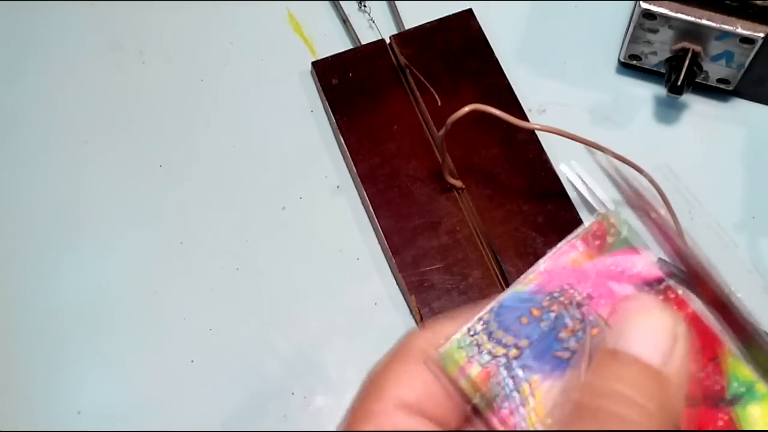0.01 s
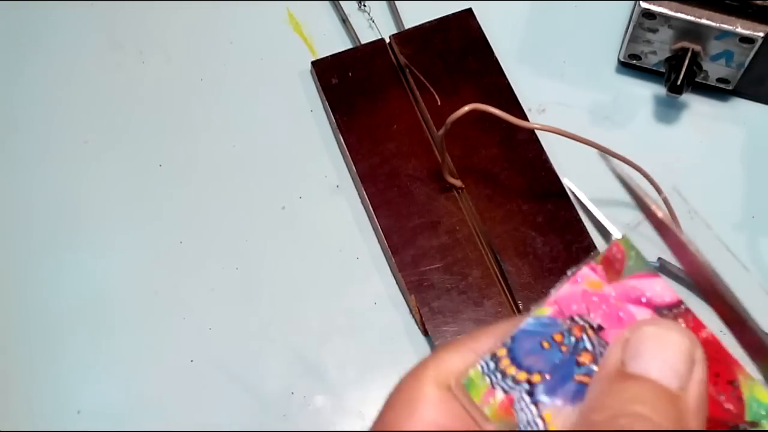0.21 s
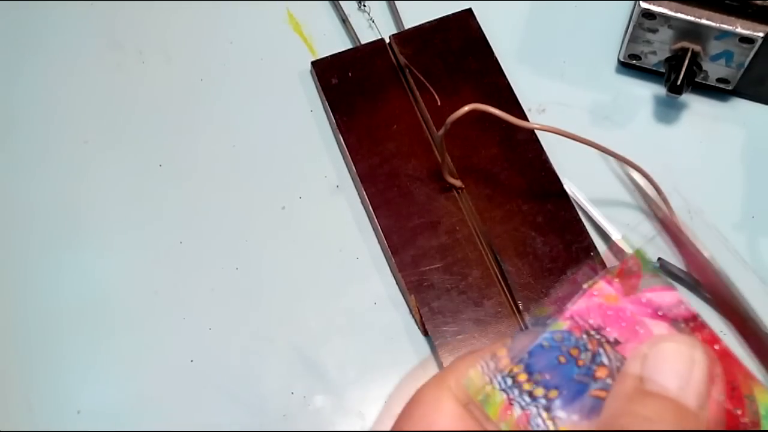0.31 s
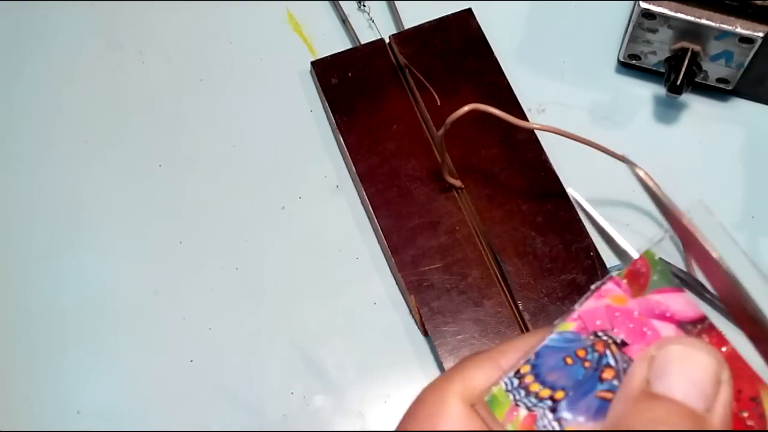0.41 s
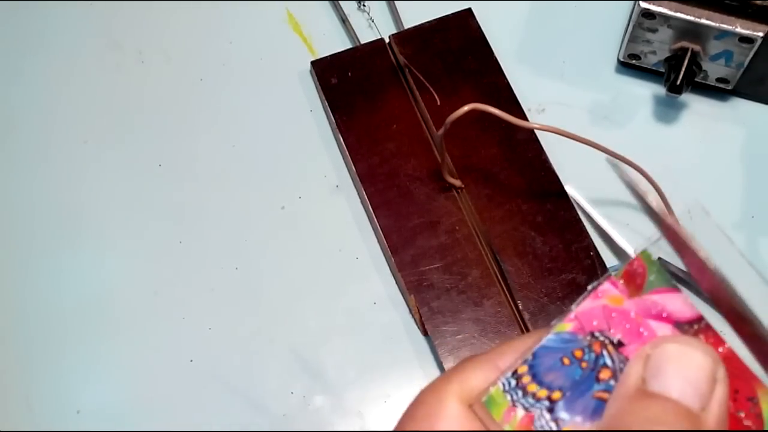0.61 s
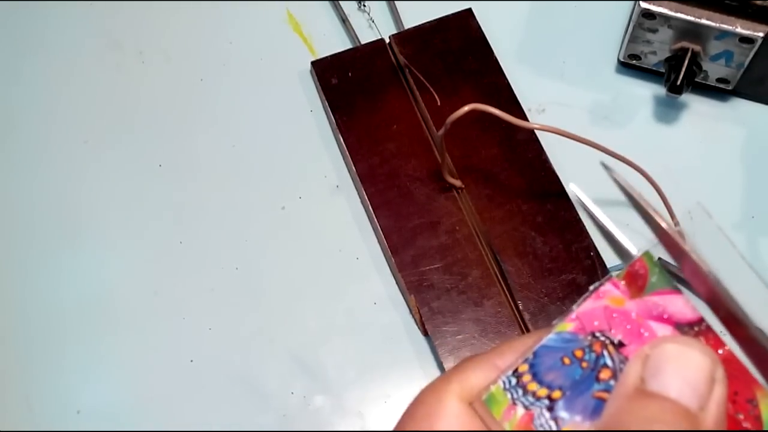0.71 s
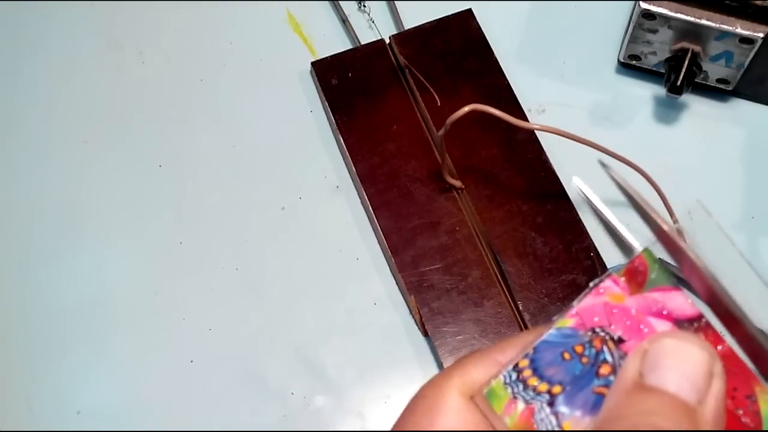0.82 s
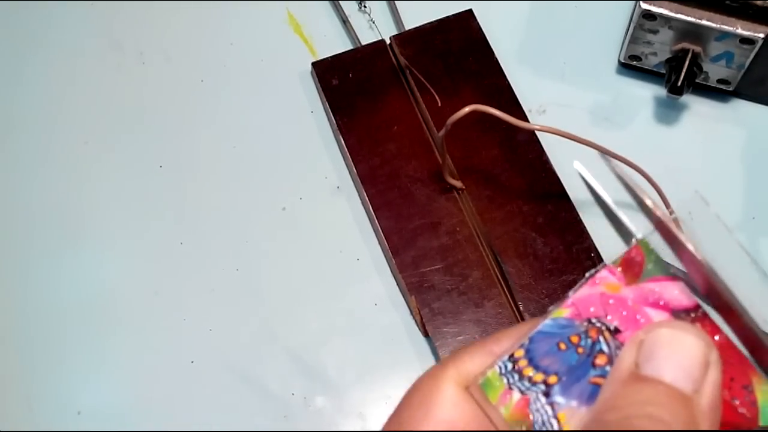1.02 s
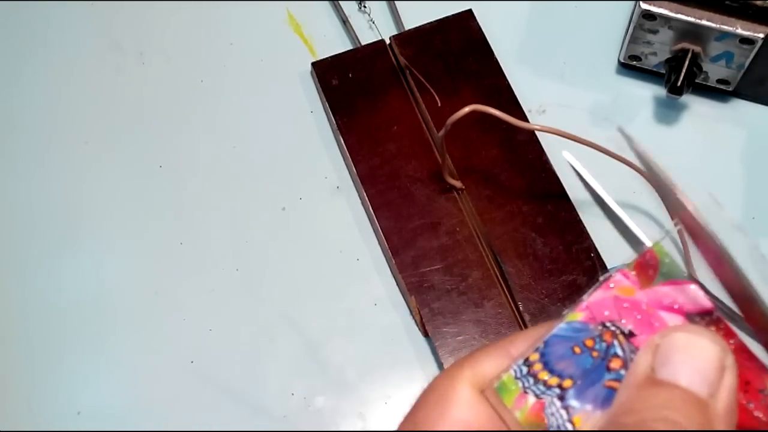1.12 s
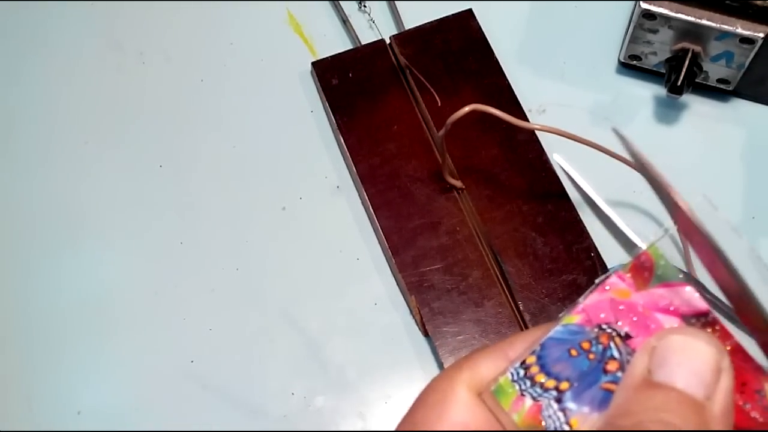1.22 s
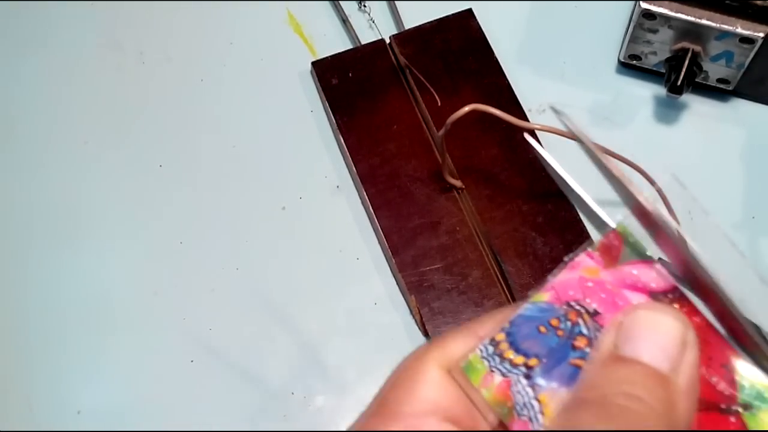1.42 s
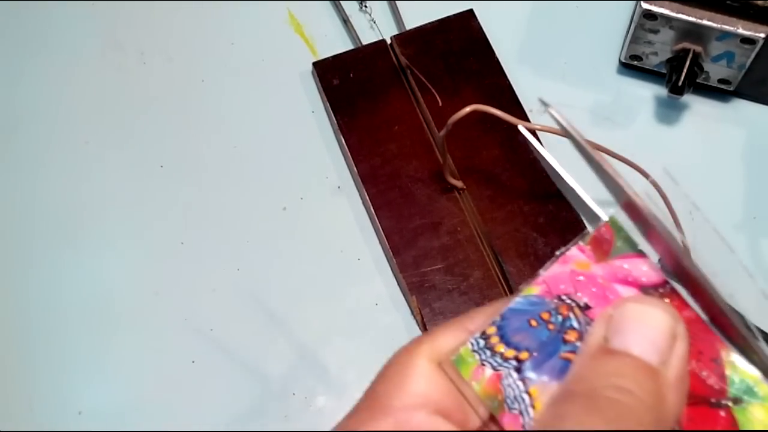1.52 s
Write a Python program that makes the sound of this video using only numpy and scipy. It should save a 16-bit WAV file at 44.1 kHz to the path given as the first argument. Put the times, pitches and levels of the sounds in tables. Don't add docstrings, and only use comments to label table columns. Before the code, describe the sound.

Close to a small microphone at a work table, scissor blades nip crisp plastic in short uneven snaps with tiny ticks between, a light rasp as they open, and one last snap over low hiss and hum.

```python
import sys
import numpy as np
from scipy import signal
from scipy.fft import rfft, irfft
from scipy.io import wavfile
from scipy.ndimage import uniform_filter1d

SR = 44100
rng = np.random.default_rng(int(sys.argv[2]) if len(sys.argv) > 2 else 0)


def unload_audio(sound):
    columns = np.transpose(np.atleast_2d(sound))
    steps = np.round(np.clip(columns, -1, 1) * 32767)
    wavfile.write(sys.argv[1], SR, steps.astype(np.int16))


def gain_from_decibels(decibels):
    exponent = np.asarray(decibels, float) / 20
    return 10 ** exponent


N = 70560

# freq_hz, density_db_per_hz
HISS_SPECTRUM = [(41, -48), (70, -6), (151, -14), (212, -9), (572, -17.5), (627, -17), (4370, -27.5),
                 (10600, -34), (15500, -55)]
# time_s, pitch_hz, level_db
HUM_TRACK = [(0.0, 54.3, -115), (0.098, 58, -66), (0.266, 54.7, -70.5), (0.32, 54.6, -69.5),
             (0.632, 53.45, -67.5), (0.654, 56.7, -69), (0.934, 55.8, -63), (0.992, 54.9, -66),
             (1.148, 54.2, -59.5), (1.194, 54.6, -67.5), (1.55, 53.8, -66.5), (1.6, 56, -69)]
BREAK_S = [.0100, .0495, .1976, .2013, .2097, .2109, .2122, .3186, .3368, .3872, .3916, .6575, .6870, .7273,
           1.1128, 1.1594, 1.2497, 1.3117, 1.3202, 1.3216, 1.3975, 1.5262]
# sheet_hz, sheet_peak_db, mid_db (mostly 3 to 5.5 kHz), body_db (under 2.8 kHz), edge_db (over 6
# kHz)
BREAK_LEVELS = [(4140, -44.5, -65, -45.5, -78), (4200, -52.5, -82, -77, -75), (3520, -70, -71, -34, -74),
                (4340, -20.5, -25, -24, -22), (4400, -52, -36, -50, -56), (4210, -21, -50, -19, -65),
                (3730, -17.5, -45, -24, -47), (4530, -38.5, -50, -43, -40.5), (4800, -50.5, -73, -72, -81),
                (4700, -69, -69, -87, -75), (4410, -10.5, -13.5, -15.5, -12.5),
                (4430, -50.5, -71, -77, -68), (4470, -51, -80, -71, -84), (4550, -41.5, -66, -67, -65),
                (3700, -39.5, -46, -38, -70), (4070, -52.5, -51, -60, -52), (3940, -74, -57, -66, -86),
                (4540, -36, -45, -37, -35.5), (4480, -16, -26, -14, -59), (4630, -18, -20.5, -52, -18.5),
                (4570, -52, -58, -48, -52.5), (4940, -41, -54, -51, -41.5)]
# freq_hz, width_hz, level_db
BODY_MODES = [(504, 400, -16), (950, 260, 1), (1700, 142, -4.5), (1959, 204, 12), (2620, 625, 11.5)]
# freq_hz, width_hz,
# level_db
MID_MODES = [(3260, 380, 0), (3680, 250, -11), (5390, 450, -5)]
# freq_hz, width_hz, level_db
EDGE_MODES = [(6200, 1270, 27), (7300, 1200, -23), (8000, 1600, -21), (10300, 2000, -30.5),
              (13200, 2500, -36)]
# time_s, level_db
SCRAPE_TRACK = [
    (1.06, -89),
    (1.072, -69),
    (1.086, -67),
    (1.095, -54),
    (1.112, -59),
    (1.139, -55.5),
    (1.165, -67.5),
    (1.19, -70.5),
    (1.22, -78),
]

HISS_DB, HUM_WAVER_HZ = -64.5, 2.5
SHEET_WIDTH_HZ, CLICK_GAIN, EDGE_CLICK_GAIN = 1150, 0.8, 0.45
CRACKLE_DB, CRACKLE_T60_S, CRACKLE_SCATTER_DB = -22, 0.02, 2
ROOM_DB, ROOM_T60_S, ROOM_RISE_S, ROOM_SCATTER_DB = -25.5, 0.072, 0.00033, 1.2
LATE_DB, LATE_T60_S = -46, 0.16
BODY_ROOM_DB, MID_ROOM_DB, BODY_SOFT_HZ = -4.5, -6, 6800
CUTS_LOW_HZ, CUTS_HIGH_HZ = 480, 12500
SCRAPE_BODY_DB, SCRAPE_EDGE_DB, SCRAPE_SCATTER_DB = -5, -26, 1.5
GAP_HZ, GAP_WIDTH_HZ, TOP_HZ, LOW_HZ = 12000, 850, 16600, 47


def fade(t_s, start_db, t60_s):
    return gain_from_decibels(start_db - 60 * t_s / t60_s)


def grains(count, scatter_db):
    x = rng.standard_normal(count) * gain_from_decibels(scatter_db * rng.exponential(size=count))
    return x / x.std()


def ring(x, modes, passes=1):
    bank = []
    for hz, width_hz, db in modes:
        sos = signal.tf2sos(*signal.iirpeak(hz, hz / width_hz, SR))
        bank.append((gain_from_decibels(db), np.tile(sos, (passes, 1))))

    def run(v):
        return sum(gain * signal.sosfilt(sos, v) for gain, sos in bank)

    return run(x) / np.abs(run(signal.unit_impulse(512))).max()


def background():
    hz, db = np.array(HISS_SPECTRUM).T
    bin_hz = np.fft.rfftfreq(N, 1 / SR)
    shape = gain_from_decibels(np.interp(np.log(bin_hz + 1), np.log(hz), db))
    hiss = irfft(rfft(rng.standard_normal(N)) * shape, N)

    time_s, pitch_hz, level_db = np.array(HUM_TRACK).T
    t_s = np.arange(N) / SR
    waver = uniform_filter1d(rng.standard_normal(N), size=3000)
    hum_hz = np.interp(t_s, time_s, pitch_hz) + HUM_WAVER_HZ * waver / waver.std()
    hum_rms = gain_from_decibels(np.interp(t_s, time_s, level_db))
    hum = np.sqrt(2) * hum_rms * np.sin(2 * np.pi * np.cumsum(hum_hz) / SR)
    return hiss / hiss.std() * gain_from_decibels(HISS_DB) + hum


def cuts():
    t_s = np.arange(12000) / SR
    out = np.zeros(N + len(t_s))
    room_rise = 1 - np.exp(-t_s / ROOM_RISE_S)
    impulse = signal.unit_impulse(len(t_s))
    click = CLICK_GAIN * impulse
    soft = signal.butter(2, BODY_SOFT_HZ, fs=SR, output="sos")
    for start_s, (sheet_hz, sheet_db, mid_db, body_db, edge_db) in zip(BREAK_S, BREAK_LEVELS):
        crackle = fade(t_s, CRACKLE_DB, CRACKLE_T60_S) * grains(len(t_s), CRACKLE_SCATTER_DB)
        echoes = room_rise * grains(len(t_s), ROOM_SCATTER_DB)
        tail = crackle + fade(t_s, ROOM_DB, ROOM_T60_S) * echoes
        late = fade(t_s, LATE_DB, LATE_T60_S) * echoes

        sheet = ring(tail + late - click, [(sheet_hz, SHEET_WIDTH_HZ, 0)], passes=2)
        mid = ring(gain_from_decibels(MID_ROOM_DB) * tail - click, MID_MODES, passes=2)
        body = signal.sosfilt(soft, ring(gain_from_decibels(BODY_ROOM_DB) * tail - click, BODY_MODES))
        edge = ring(tail - EDGE_CLICK_GAIN * impulse, EDGE_MODES)

        sound = gain_from_decibels(sheet_db) * sheet - gain_from_decibels(mid_db) * mid
        sound += gain_from_decibels(body_db) * body + gain_from_decibels(edge_db) * edge
        start = int(start_s * SR)
        out[start:start + len(t_s)] += sound
    band = signal.butter(3, [CUTS_LOW_HZ, CUTS_HIGH_HZ], "band", fs=SR, output="sos")
    return signal.sosfilt(band, out[:N])


def scrape():
    time_s, level_db = np.array(SCRAPE_TRACK).T
    rub = grains(N, SCRAPE_SCATTER_DB)
    x = ring(rub, [(3443, 820, -2), (4400, 2400, 0), (5370, 910, -9)], passes=3)
    x += gain_from_decibels(SCRAPE_BODY_DB) * ring(rub, BODY_MODES, passes=2)
    x += gain_from_decibels(SCRAPE_EDGE_DB) * ring(rub, EDGE_MODES)
    return x / x.std() * gain_from_decibels(np.interp(np.arange(N) / SR, time_s, level_db, -120, -120))


def scene():
    return (cuts() + scrape() + background())[None]


def roll_off(x):
    return signal.sosfilt(signal.butter(12, 16430, fs=SR, output="sos"), x)


def record(dry):
    gap_hz = [GAP_HZ - GAP_WIDTH_HZ / 2, GAP_HZ + GAP_WIDTH_HZ / 2]
    gap = signal.butter(3, gap_hz, "bandstop", fs=SR, output="sos")
    low_cut = signal.butter(4, LOW_HZ, "high", fs=SR, output="sos")
    top = signal.cheby2(10, 60, TOP_HZ, fs=SR, output="sos")
    mix = signal.sosfilt(np.vstack([gap, low_cut, top]), dry)
    return roll_off(mix)


dry = scene()
out = record(dry)
unload_audio(out)
```